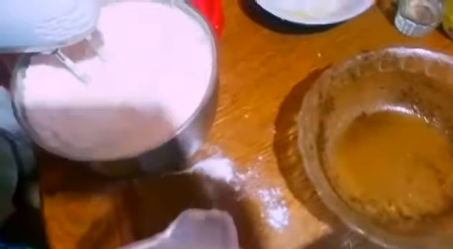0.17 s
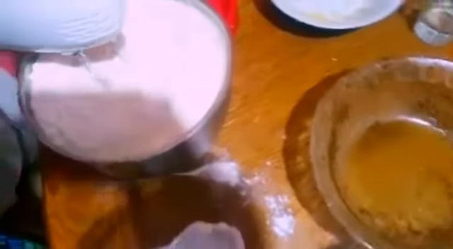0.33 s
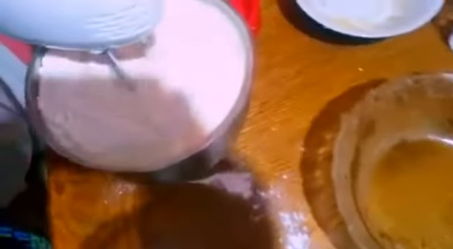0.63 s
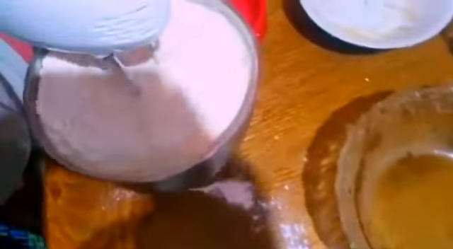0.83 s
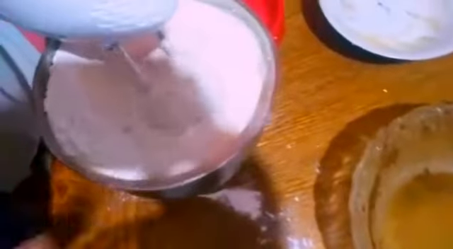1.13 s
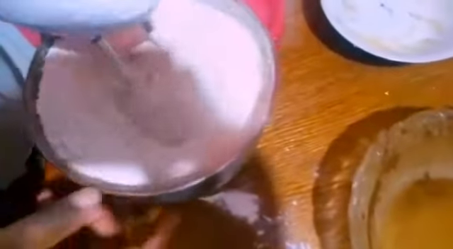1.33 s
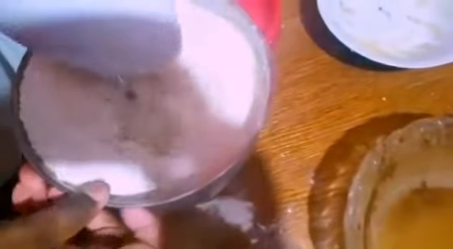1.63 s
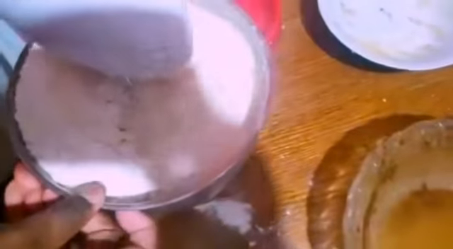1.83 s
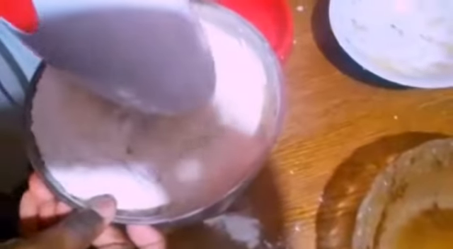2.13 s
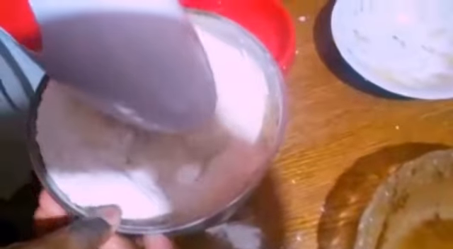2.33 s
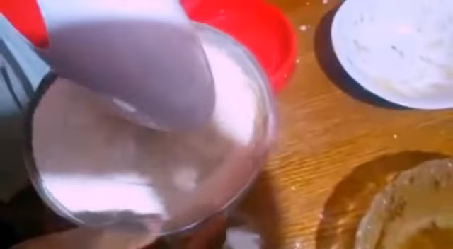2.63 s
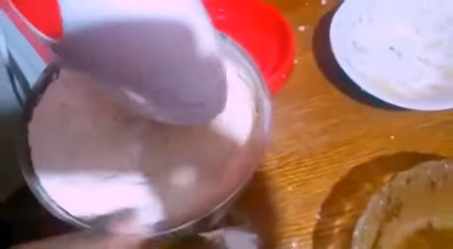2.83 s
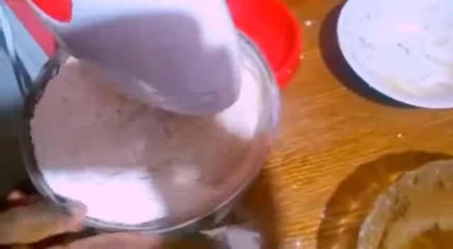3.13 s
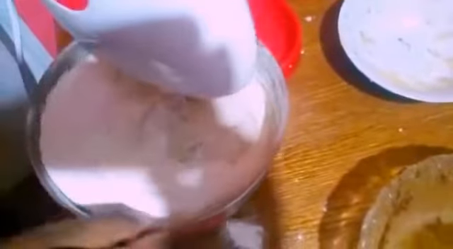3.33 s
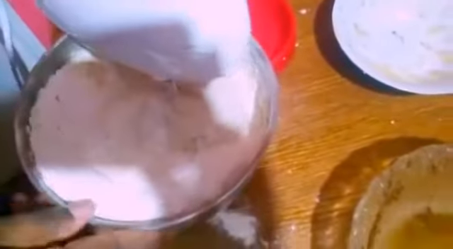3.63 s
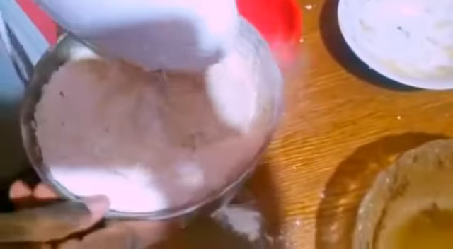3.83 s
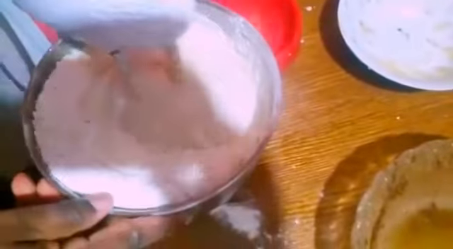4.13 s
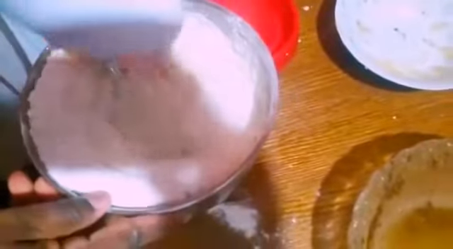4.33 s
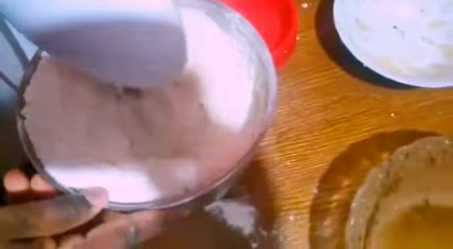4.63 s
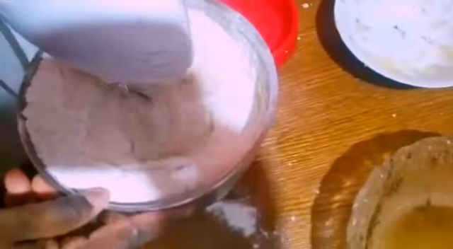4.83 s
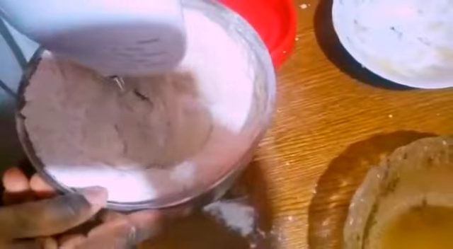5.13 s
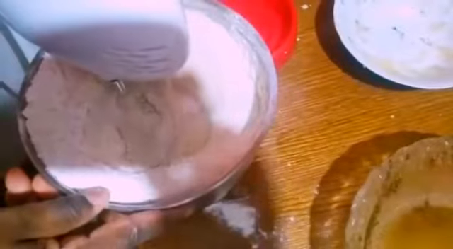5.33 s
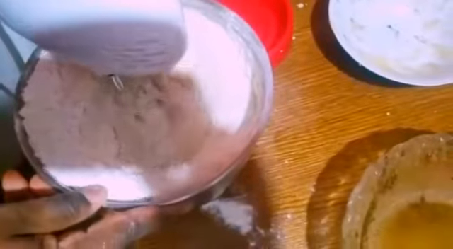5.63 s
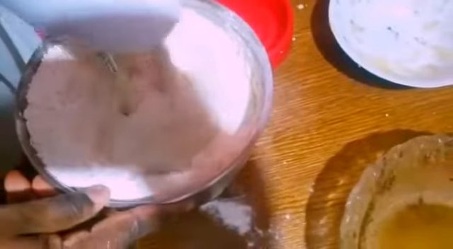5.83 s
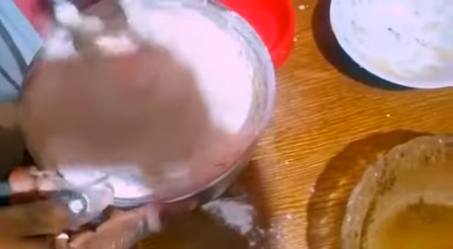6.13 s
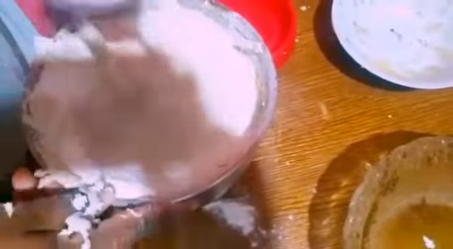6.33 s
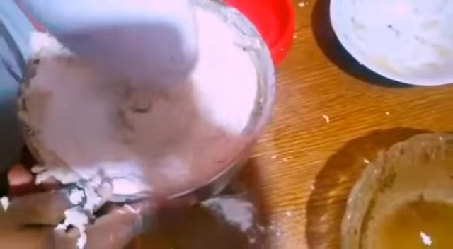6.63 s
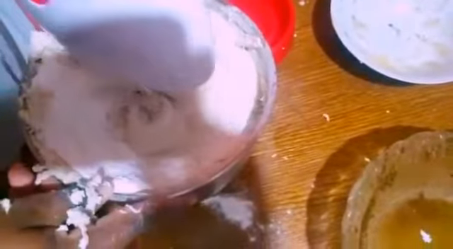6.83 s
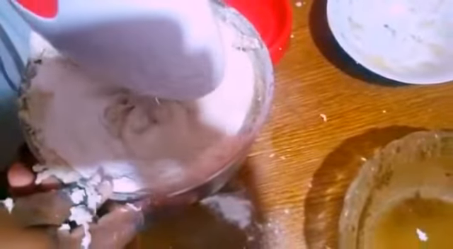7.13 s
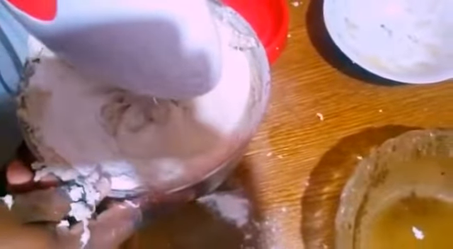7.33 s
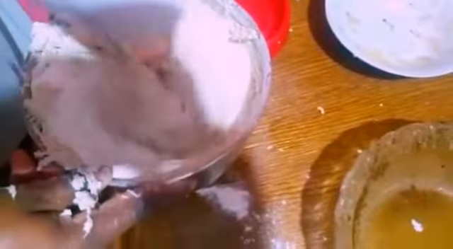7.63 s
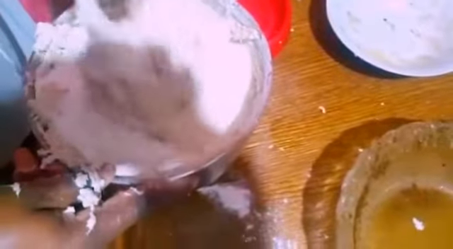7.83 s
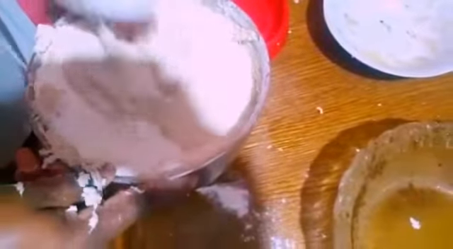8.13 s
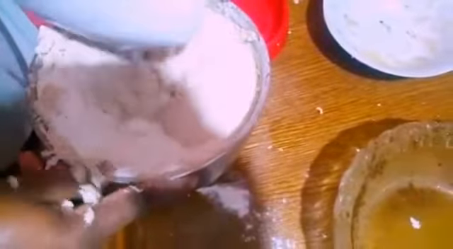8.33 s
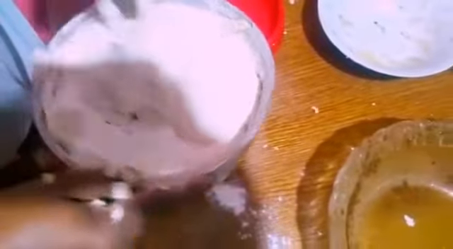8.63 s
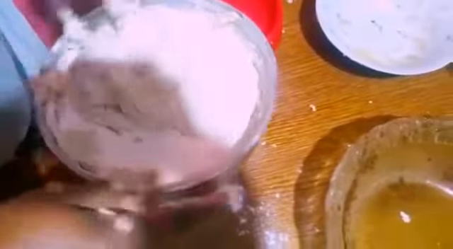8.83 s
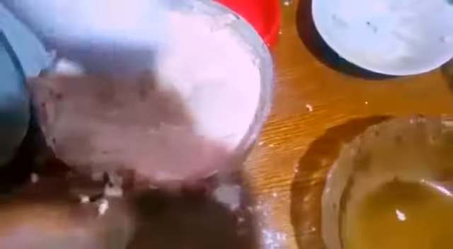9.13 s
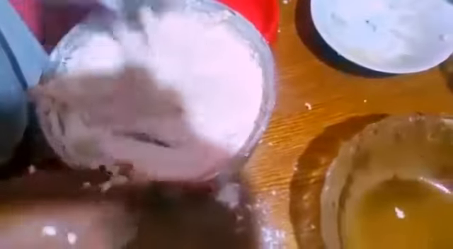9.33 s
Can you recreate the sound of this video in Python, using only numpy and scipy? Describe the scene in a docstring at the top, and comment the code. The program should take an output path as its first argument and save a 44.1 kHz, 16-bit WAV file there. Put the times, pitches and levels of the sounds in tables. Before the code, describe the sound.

An electric hand mixer spins up and runs with a wavering whine and rush, clicks off, and a metal bowl is lightly scraped.

```python
"""A switch clicks over faint room tone and a hand mixer spins up, close by in a dry-sounding kitchen.
It works through batter in a steel bowl on a wooden table: the twelve-slot rotor whines through the
housing and throbs with the mains, the body shakes, fan and brushes rush. The bowl is bumped, dragged
and scraped, mostly after the mixer clicks off. The microphone is a hand-held two-port stereo one,
its picture widened by cross-feed, with a few low thuds from the hand."""
import sys
import numpy as np
from scipy import signal
from scipy.fft import rfft, irfft, next_fast_len
from scipy.io import wavfile
from scipy.ndimage import uniform_filter1d

SR = 44100
rng = np.random.default_rng(int(sys.argv[2]) if len(sys.argv) > 2 else 0)


def log_audio(samples):
    """Write samples as a 16-bit WAV file to the path given in sys.argv[1]."""
    # one column per channel
    frames = np.atleast_2d(samples).T
    # limit to full scale, then quantise
    limited = np.clip(frames, -1, 1)
    pcm = np.round(limited * 32767).astype(np.int16)
    wavfile.write(sys.argv[1], SR, pcm)


N = 417627
TIME = np.arange(N) / SR
SWITCH_OFF_S = 7.127

# The mixer's housing, heard from the front. Each row: mode in Hz, width in Hz, gain in dB.
HOUSING_MODES = [(642, 200, -18.5), (905, 140, -8.5), (1359, 120, -10.5), (2867, 122.5, 2.5)]


def from_db(db):
    """Decibels to gain."""
    return 10 ** (np.asarray(db) / 20)


def rms_one(x):
    """Scaled to unit power."""
    return x / np.sqrt(np.mean(x ** 2) + 1e-20)


def in_time(rows):
    """One curve per column, joining rows that begin with a time in seconds."""
    seconds, *columns = np.transpose(rows)
    return [np.interp(TIME, seconds, column) for column in columns]


def colour(x, spectrum):
    """Shapes a sound by a smooth spectrum, given as rows of Hz and dB."""
    hz, db = np.transpose(spectrum)
    size = next_fast_len(N)
    grid = np.arange(size // 2 + 1) * SR / size + 1
    gain = from_db(np.interp(np.log(grid), np.log(hz), db))
    return irfft(rfft(x, size) * gain, size)[..., :N]


def drift(rate_hz):
    """A smooth random wander with a spread of 1."""
    r = np.exp(-80 * np.pi * rate_hz / SR)
    slow = signal.lfilter([1], [1, -2 * r, r * r], rng.standard_normal(N // 40 + 2002))[2000:]
    return np.interp(np.arange(N) / 40, np.arange(len(slow)), rms_one(slow))


def ring(force, hz, t60):
    """One decaying mode."""
    r, w = from_db(-60 / (t60 * SR)), 2 * np.pi * hz / SR
    return signal.lfilter([0, np.sin(w)], [1, -2 * r * np.cos(w), r * r], force + 1e-18)


def grains(per_s, uneven_db):
    """Random contacts of uneven size, two unrelated rows."""
    sizes = from_db(uneven_db * np.minimum(rng.exponential(1, (2, N)), 5))
    signs = rng.choice([-1, 1], (2, N))
    return rms_one(sizes * signs * (rng.random((2, N)) < per_s / SR))


def swells(rows, attack_s, t60):
    """One gain curve per level column: each row rises, holds for its length and dies away."""
    out = 0
    for start, length, *db in rows:
        rise = np.clip((TIME - start) / attack_s, 0, 1)
        fall = from_db(-60 * np.maximum(TIME - start - length, 0) / t60)
        out = out + from_db(db)[:, None] * rise * fall
    return out


def room_tone():
    """A faint, steady bed of mostly low noise, two unrelated rows."""
    # Each row: frequency in Hz, relative noise density in dB.
    spectrum = [(57, 0), (187, -3), (456, -8), (806, -19), (1414, -21.5), (2569, -38.5), (4631, -28),
                (8831, -35.5)]
    return from_db(-47.5) * rms_one(colour(rng.standard_normal((2, N)), spectrum))


def ticks():
    """Switch and beaters tick; each tick rings the plastic modes with strengths of its own."""
    # Each row: start in seconds, relative level in dB, extra dB for the modes below 2 kHz.
    hits = [(0.1451, -13, -4), (0.273, -17.5, -3), (0.4426, -22, -6), (0.5406, -27.5, 0),
            (5.2039, -14.5, -4.5), (5.3125, -15, -5.5), (5.47, -20, 3), (5.5874, -30, 15),
            (5.5998, -14, 1.5), (7.1259, -3.5, -8)]
    # Each row: mode in Hz, gain in dB, T60 in seconds.
    plastic_modes = [(978, -2.5, .02), (1440, 2, 0.014), (2600, -8.5, 0.0072), (3850, 3, 0.005),
                     (5120, 4, 0.0027), (8750, 0, 0.0046), (11300, -15.5, 0.0024)]
    starts, peak_db, body_db = np.transpose(hits)
    chance_db = rng.normal(0, 2, (len(starts), len(plastic_modes)))
    out = 0
    for k, (hz, mode_db, t60) in enumerate(plastic_modes):
        strike_db = peak_db + mode_db + chance_db[:, k] + body_db * (hz < 2000)
        clicks = np.zeros(N)
        clicks[np.round(starts * SR).astype(int)] = from_db(strike_db)
        out = out + ring(clicks, hz, t60)
    return out * from_db(-3.5)


def housing(force, modes, leak_db):
    """The shell answers at its modes and lets a little through elsewhere."""
    out = from_db(leak_db) * force
    for hz, width, level_db in modes:
        r = np.exp(-np.pi * width / SR)
        b = (1 - r * r) / 2 * np.array([1, 0, -1])
        a = [1, -2 * r * np.cos(2 * np.pi * hz / SR), r * r]
        stator = signal.lfilter(b, a, force)
        out = out + from_db(level_db) * signal.lfilter(b, a, stator)  # then the shell: steep skirts
    return out


def slot_whine(turn, throb, strength):
    """Twelve slots pass the poles each turn and drive the housing; returns front and flank sound."""
    # The modes that radiate sideways. Each row: mode in Hz, width in Hz, gain in dB.
    flank_modes = [(890, 80, -22), (2835, 210, 1.5)]
    slots = np.sqrt(2) * np.sin(12 * turn) + 0.24 * np.sin(24 * turn) + 0.13 * np.sin(13 * turn)
    force = strength * from_db(1.34 * drift(15)) * (1 + throb) * slots
    return housing(force, HOUSING_MODES, leak_db=-27), housing(force, flank_modes, leak_db=-32)


def slot_overtones(turn, throb):
    """High harmonics of the slot tone, wavering in level and phase with the mains."""
    # Each row: multiple of the shaft rate, relative level in dB.
    partials = [(12, -1), (24, 0.5), (36, -2.5), (48, -4.5), (60, -8)]
    angle = turn + .024 * drift(120)
    tones = sum(from_db(db + 2 * drift(9.2)) * np.sin(k * angle + 0.49 * throb) for k, db in partials)
    # The air gap narrows once per turn: sidebands one shaft multiple apart.
    eccentricity = 1 + 0.4 * (np.cos(turn) + 0.73 * np.cos(2 * turn))
    return tones * (1 + 0.28 * throb) * eccentricity


def unbalance(turn, shaft_hz, fourth_db):
    """The unbalanced rotor shakes the mixer's body at low multiples of the shaft rate."""
    # Each row: multiple of the shaft rate, relative level in dB.
    partials = [(1, 1), (2, -5), (3, -4), (4, 0.5), (5, -14)]
    # How the body radiates the shake. Each row: frequency in Hz, gain in dB.
    radiation = [(150, -10), (205, -6.5), (228, -2), (242, -2), (262, 2.5), (390, 10), (450, -1.5),
                 (485, -6.5), (525, 4.5), (620, -18.5), (690, -1), (770, -3), (830, -1), (910, -0.5),
                 (970, -1.5), (1030, -23), (1130, -11.5), (1330, 11.5)]
    body_hz, body_db = np.transpose(radiation)
    shake = 0
    for k, db in partials:
        level_db = db + (k == 4) * fourth_db + np.interp(k * shaft_hz, body_hz, body_db)
        shake = shake + from_db(level_db + 2.47 * drift(9.6)) * np.sin(k * turn)
    return np.sqrt(2) * shake


def fan_and_brushes():
    """Air and gear grit rush through the housing, with brush hiss on top; two unrelated rows."""
    # Each row: frequency in Hz, relative noise density in dB.
    spectrum = [(42, -9.5), (81, -12), (148, -2), (252, -3.5), (400, -2.5), (570, -9.5), (721, 0.5),
                (894, -4.5), (1140, -10.5), (1612, -7.5), (2236, -7), (2872, -5.5), (3853, -8),
                (5408, -10.5), (7858, -15), (10677, -15.5), (13099, -23)]
    air = colour(rng.standard_normal((2, N)) + .5 * grains(900, uneven_db=1.5), spectrum)
    low = signal.sosfilt(signal.butter(2, 2400, fs=SR, output="sos"), air)
    fan = from_db(1.8 * drift(16)) * rms_one(low + 1.8 * housing(low, HOUSING_MODES, leak_db=-25))
    sparks = 1 + 0.067 * np.cos(2 * np.pi * 100 * TIME)  # brushes spark twice per mains cycle
    hiss = from_db(-4.5 + 1.5 * drift(28)) * sparks * rms_one(air - low)
    return fan + hiss


def mixer():
    """The motor slows in the batter and races when lifted; returns front, flank, tones and rush."""
    # Each row: time in seconds, shaft rate in Hz, slot force in dB, rush in dB.
    motor = [(0.145, 30, -30, -25.5), (0.175, 56.6, -18, -32.5), (0.205, 77.1, 3.5, -33.5),
             (0.22, 94.4, -17, -32), (0.25, 123, -20, -31.5), (0.3, 143.6, -5, -24.5),
             (0.36, 170.9, -15, -40.5), (0.45, 182.5, -20, -40.5), (0.65, 202, -13.5, -38),
             (0.97, 209.6, -18, -33), (1.37, 243.4, -14, -27.5), (1.55, 242, -15, -27.5),
             (1.8, 230.1, -15.5, -31), (2.1, 225.2, -18, -29.5), (2.55, 222.7, -9, -24.5),
             (2.75, 227, -13.5, -25.5), (3.15, 226, -12, -26.5), (3.4, 225.8, -22, -25),
             (3.65, 228.6, -25.5, -27.5), (3.95, 233.7, -19, -26), (4.1, 245.1, -19.5, -28.5),
             (4.3, 266, -12, -25.5), (4.43, 266.2, -12, -22.5), (4.58, 248.5, -9, -25.5),
             (4.75, 243.1, -14.5, -27.5), (5.2, 241.5, -17, -27.5), (5.65, 225.7, -17.5, -29.5),
             (5.85, 229.7, -24.5, -30), (5.94, 231.9, -12.5, -26), (6.08, 242, -24.5, -25.5),
             (6.14, 245, -18.5, -26.5), (6.32, 259.5, -21.5, -24), (6.45, 248.7, -11, -23.5),
             (6.65, 233.1, -18.5, -30), (6.9, 224.3, -15, -27.5), (7.1, 225.6, -13, -22.5)]
    # How the mixer is turned to the microphone. Each row: time in seconds, overtones in dB, shake
    # in dB, extra dB for its fourth multiple, share of the flank facing the ports.
    grip = [(0.3, -53, -49.5, -4, 0.98), (0.55, -46.5, -45.5, -3, .5), (0.9, -43.5, -41, 0, .3),
            (1.5, -43.5, -42.5, 8, .3), (2.1, -42, -30.5, -4.5, 0.7), (2.65, -34, -31, 0.5, .8),
            (3.0, -40.5, -37.5, 8, 0.61), (3.35, -36, -34, 1, 0.93), (3.9, -42.5, -39, 4.5, 1),
            (4.2, -43.5, -38, -4, 0.81), (4.45, -39.5, -30.5, -10, 0.42), (5.1, -36, -34.5, -10.5, .3),
            (5.4, -56.5, -37, 0, .45), (6.1, -42, -43, 0, 0.47), (6.35, -36.5, -35.5, -15, 0.53),
            (6.6, -53, -35, -3, 0.59), (7.12, -38.5, -32, -5.5, .5)]
    # The mains throb in the slot force. Each row: frequency in Hz, depth of modulation.
    mains = [(50, 0.22), (100, 1.0), (200, 0.26), (300, 0.068)]
    shaft_hz, whine_db, rush_db = in_time(motor)
    overtone_db, shake_db, fourth_db, facing = in_time(grip)
    switch_on_s, inertia_s = motor[0][0], .1  # the rotor's mass rounds every change of speed
    shaft_hz = uniform_filter1d(shaft_hz, size=int(inertia_s * SR), mode="nearest")
    switching = [switch_on_s, switch_on_s + 0.0064, SWITCH_OFF_S - .02, SWITCH_OFF_S]
    on = np.interp(TIME, switching, [0, 1, 1, 0])
    turn = 2 * np.pi * np.cumsum(shaft_hz + 0.246 * drift(9.2)) / SR
    throb = sum(depth * np.cos(2 * np.pi * hz * TIME + 1.84 * drift(0.28)) for hz, depth in mains)
    front, flank = slot_whine(turn, throb, on * from_db(whine_db))
    overtones = from_db(overtone_db) * slot_overtones(turn, throb)
    shake = from_db(shake_db) * unbalance(turn, shaft_hz, fourth_db)
    rush = from_db(rush_db) * fan_and_brushes()
    return front, facing * flank, on * (overtones + shake), on * rush


def bowl():
    """A knock is a dying burst of small contacts; dragging keeps them coming and rumbles the table."""
    # Each row: start and length in seconds, then rumble, bowl ring and scrape in dB.
    drags = [(.29, 0.073, -15.5, -27.5, -44), (3.27, 0.31, -26, -30, -53), (3.88, .12, -25.5, -44, -57),
             (6.88, 0.074, -24, -45, -60), (7.3, 0.23, -55, -68, -69), (7.55, 0.039, -50, -62, -80),
             (7.92, 0.11, -35.5, -57, -68), (8.11, .03, -37, -66, -62), (8.2, 0.13, -41, -50.5, -55.5),
             (8.42, 0.097, -37, -54, -61), (8.55, 0.21, -40.5, -49.5, -50), (8.82, 0.43, -31, -49.5, -61),
             (9.31, 0.13, -23, -43, -62)]
    # Each row: start in seconds, level in dB, brightness in dB, T60 in seconds (capped below).
    knocks = [(0.296, -22, -45, 0.16), (7.571, -36, -44, 0.051), (7.607, -35.5, -54, 0.061),
              (7.755, -61, -19, 0.05), (7.804, -52, -16, 0.042), (7.843, -51, -10, 0.043),
              (7.906, -42.5, -7, 0.058), (7.954, -48, -16, 0.18), (8.004, -43, -4, 0.041),
              (8.08, -38.5, -12, 0.032), (8.209, -39.5, -21, 0.053), (8.235, -51, 3, 0.16),
              (8.284, -26.5, -41, 0.41), (8.344, -43, -11, 0.43), (8.423, -46, -33, 0.017),
              (8.844, -67, -22, 0.039), (8.892, -57, -26, 0.037), (9.058, -39, -35, 0.16),
              (9.089, -29.5, -48, 0.67), (9.121, -24, -28, 0.2), (9.163, -44, -17, 0.61),
              (9.32, -51, -43, 0.6), (9.444, -48, -1, .55)]
    # Each row: mode in Hz, gain in dB, T60 in seconds.
    steel_modes = [(690, 8.5, 0.034), (798.5, 8.5, 0.037), (889, 16, 0.013), (1040, -16, 0.042),
                   (1124, 0, 0.027), (1370, 4, 0.016), (1580, -8.5, 0.0051), (1922, -8, 0.06)]
    # The table's rumble and the bowl's scrape. Each row: frequency in Hz, relative density in dB.
    wood_spectrum = [(40, 2), (110, 1.5), (150, 7), (180, 14), (230, 7), (300, -1), (400, 5), (550, -8),
                     (1200, -64)]
    scrape_spectrum = [(900, -2.5), (1600, 1), (2500, -1), (3300, -3.5), (4200, -7.5), (5400, -10),
                       (9000, -15), (14000, -27)]

    def steel(force):
        """The bowl rings at all its modes."""
        return sum(from_db(db) * ring(force, hz, t60) for hz, db, t60 in steel_modes)

    # The beaters coast to rest in the bowl; columns as for the drags.
    coast = swells([(SWITCH_OFF_S, 0, -26.5, -36.5, -39)], attack_s=.003, t60=1.2)
    rumble_gain, ring_gain, scrape_gain = swells(drags, attack_s=0.025, t60=0.19) + coast
    for start, peak_db, bright_db, t60 in knocks:
        age = np.maximum(TIME - start, 0)
        burst = (TIME >= start) * from_db(peak_db - 60 * age / np.clip(t60, .01, .6))
        ring_gain = ring_gain + burst
        scrape_gain = scrape_gain + burst * from_db(bright_db - age / 0.012)
    contacts = grains(1100, uneven_db=-1)
    first_touch = np.round(np.array(knocks)[:, 0] * SR).astype(int) + 1
    contacts[:, first_touch] = 13  # the first touch is the hardest
    rings = steel(ring_gain * contacts) / np.std(steel(contacts[0]))
    rumble = rms_one(colour(grains(550, uneven_db=-2), wood_spectrum))
    dust = grains(5000, uneven_db=-8)
    dust[:, first_touch] = 4
    scrape = rms_one(colour(dust, scrape_spectrum))
    return rings + rumble_gain * rumble + (scrape_gain + from_db(-17) * ring_gain) * scrape


def handling_noise():
    """The hand on the microphone thuds into each port, and also pushes the two in opposite senses."""
    # Each row: start in seconds, length in seconds, level in dB.
    moves = [(.3, 0.076, -26.5), (1.4, 0.34, -52.5), (3.35, .2, -46), (3.6, .45, -46), (4.35, 0.18, -50.5),
             (4.8, 0.68, -44), (5.9, 0.45, -53.5), (6.65, 0.59, -47), (7.9, 0.36, -64), (7.3, 0.24, -60),
             (8.7, 0.48, -47)]
    thud_band = signal.butter(2, [55, 115], "band", fs=SR, output="sos")
    noise = signal.sosfilt(thud_band, rng.standard_normal((3, N)))
    thuds = noise[:2] + 0.72 * noise[2] * [[1], [-1]]
    at_rest = from_db(-57.5)
    return (at_rest + swells(moves, attack_s=.05, t60=0.17)) * rms_one(thuds)


def kitchen(x, t60=.15, wet_db=-14):
    """The room's short, diffuse echoes: a dying burst of noise."""
    age = np.arange(SR // 2) / SR
    echoes = rng.standard_normal(len(age)) * from_db(-60 * age / t60)
    return from_db(wet_db) * signal.fftconvolve(x, echoes / np.sqrt(np.sum(echoes ** 2)))[:N]


def scene():
    """At the microphone both ports hear the same sum; they differ by direction and scattered sound."""
    # What the gap between the ports makes of a sound. Each row: frequency in Hz, side to mid in dB.
    port_gap = [(40, -34), (300, -4.5), (600, -8), (1100, -14.5), (1700, -2.5), (4000, 0.5), (14000, 2)]
    direct_share = 0.3
    whine_front, whine_flank, tones, rush = mixer()
    tones = tones + ticks()
    direct, scattered = rush + bowl() + room_tone()
    across_ports = direct_share * (direct + tones) + np.sqrt(1 - direct_share ** 2) * scattered
    side = colour(across_ports, port_gap) + whine_flank
    mid = whine_front + tones + direct
    mid, side = mid + kitchen(mid), side + kitchen(mid)
    return np.array([mid + side, mid - side]) * from_db(-2.5) + handling_noise()


def record(dry):
    """Each channel loses a late copy of the other, widening the image; peaks round off, top is cut."""
    cross_feed, lag_s, blur_s, cutoff_hz = 0.73, 0.0004432, .000018, 14350
    # Small capsules miss the deep bass.
    dry = signal.sosfilt(signal.butter(2, 45, "high", fs=SR, output="sos"), dry)
    taps = np.exp(-.5 * ((np.arange(41) / SR - lag_s) / blur_s) ** 2)  # smeared, so the copy is duller
    late = signal.lfilter(taps / taps.sum(), [1], dry[::-1])
    wide = 1.2 * np.tanh((dry - cross_feed * late) / 1.2)
    return signal.sosfilt(signal.ellip(12, .5, 80, cutoff_hz, fs=SR, output="sos"), wide)


dry = scene()
out = record(dry)
log_audio(out)
```